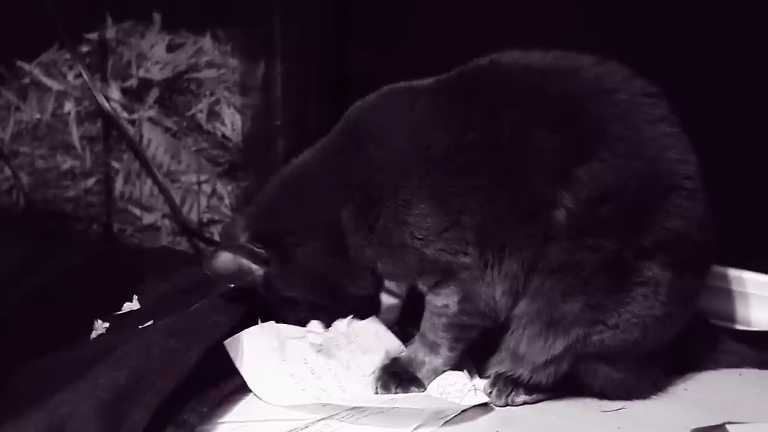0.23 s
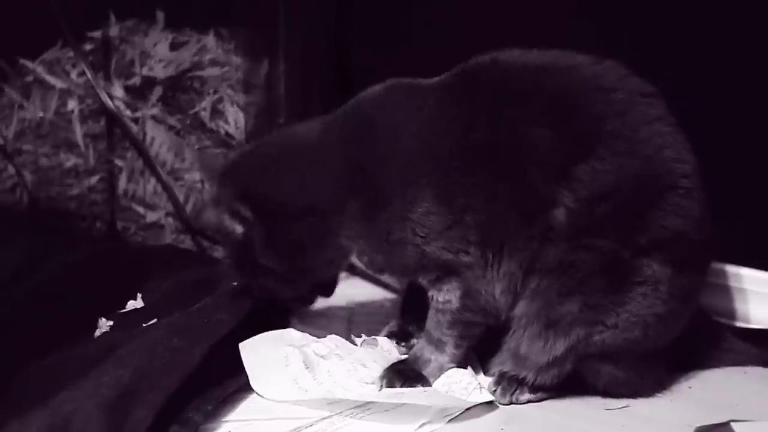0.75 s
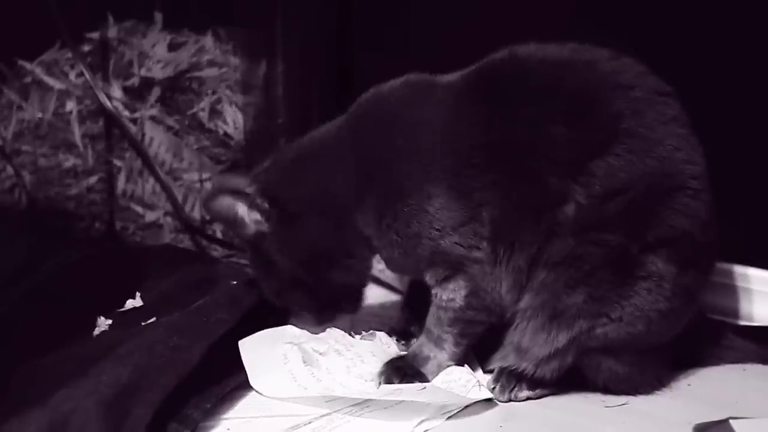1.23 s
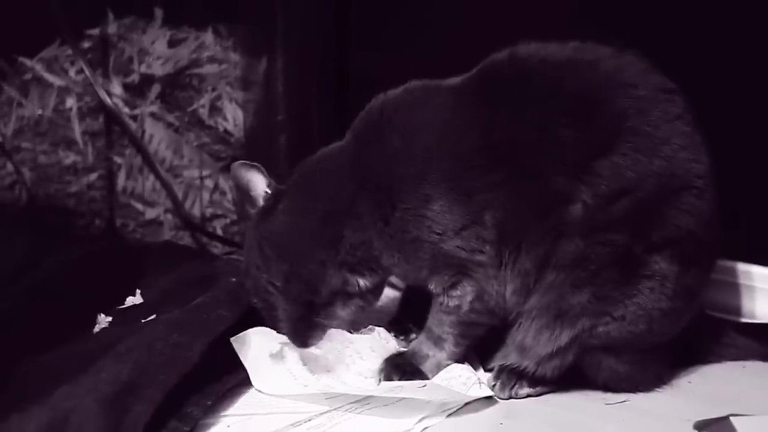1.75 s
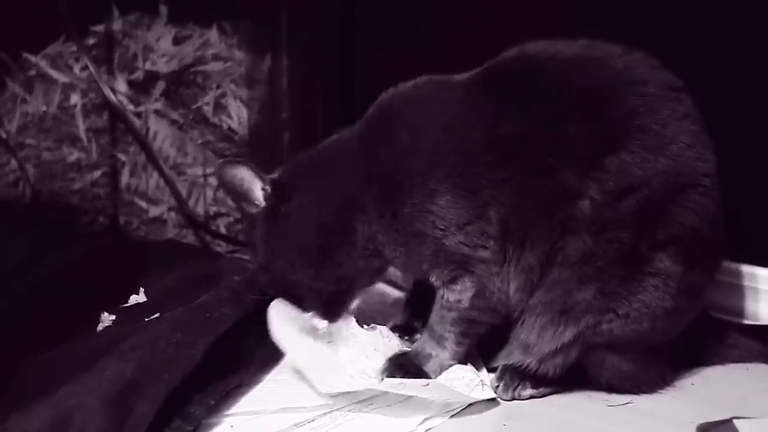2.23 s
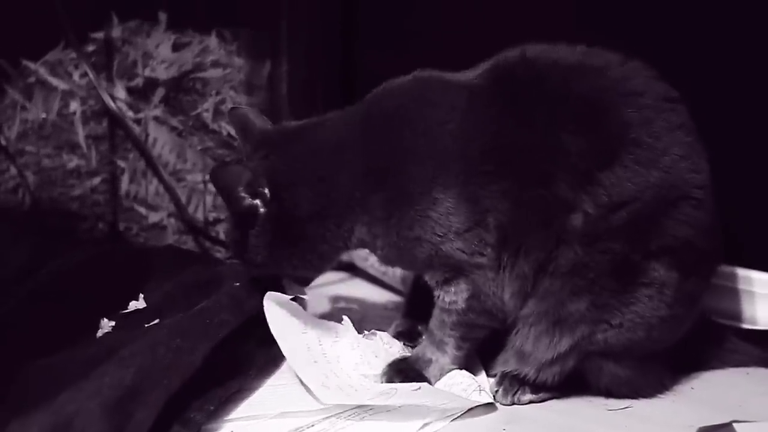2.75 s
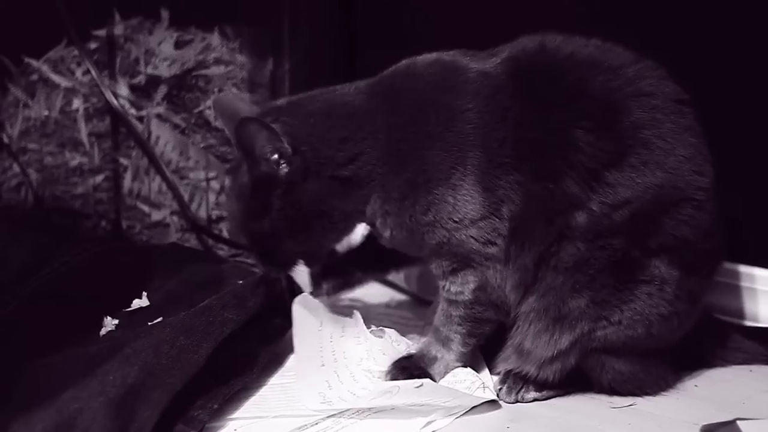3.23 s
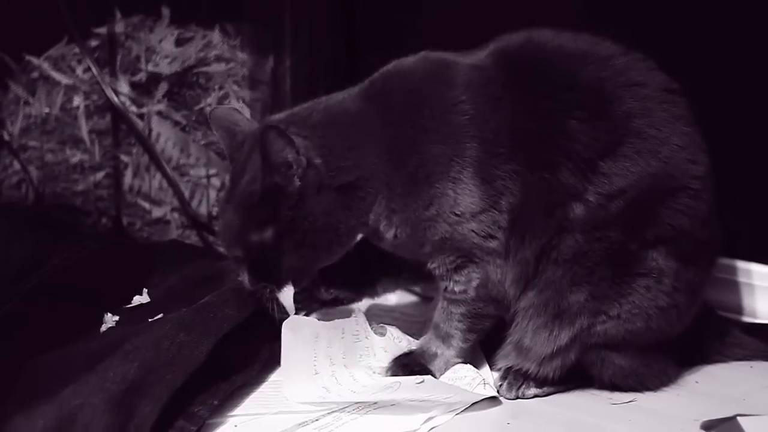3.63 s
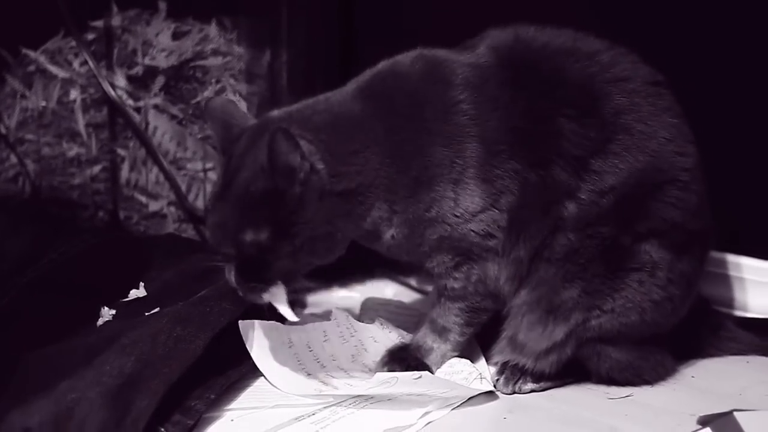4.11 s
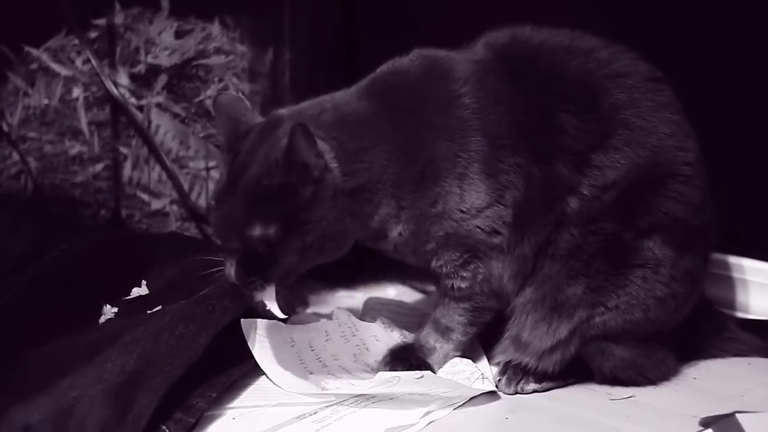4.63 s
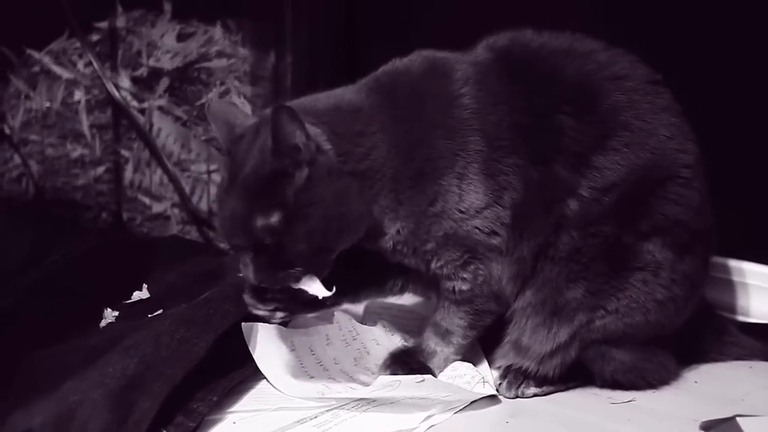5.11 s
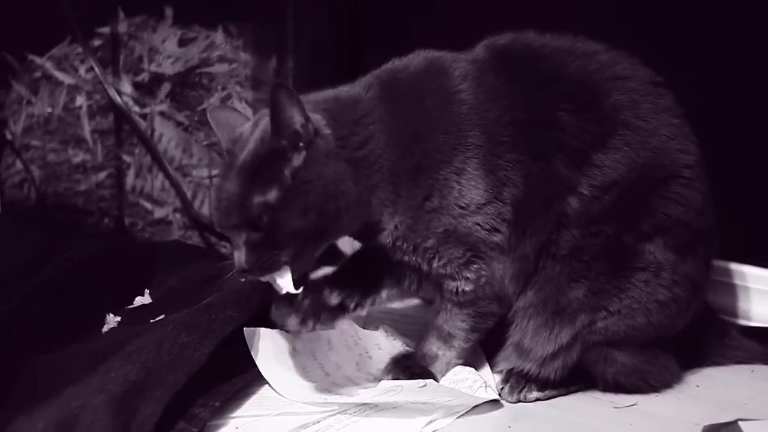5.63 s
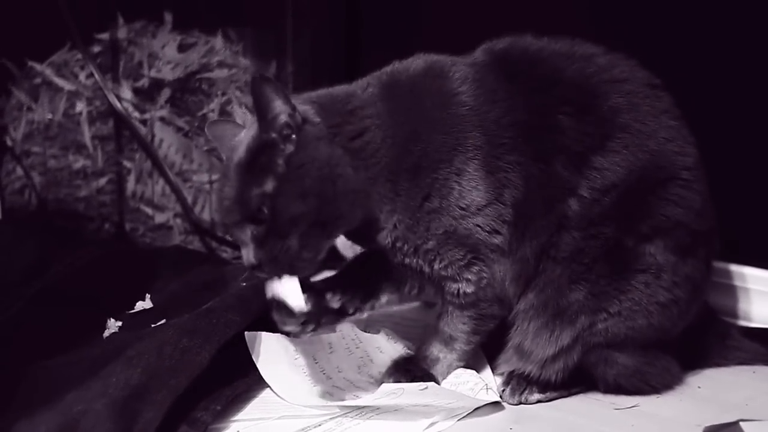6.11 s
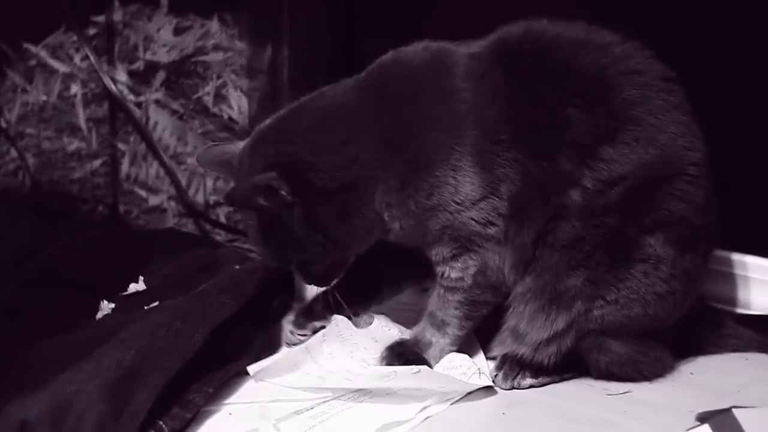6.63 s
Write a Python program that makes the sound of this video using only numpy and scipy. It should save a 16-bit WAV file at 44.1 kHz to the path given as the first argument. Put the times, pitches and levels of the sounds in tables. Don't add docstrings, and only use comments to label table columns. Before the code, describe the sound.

Close crisp paper ripping and snapping in short fits, a long spell of soft fur rustle, then a last tug and a paw thud.

```python
import sys
import numpy as np
from scipy import signal
from scipy.fft import rfft, irfft
from scipy.io import wavfile
from scipy.ndimage import uniform_filter1d

SR = 44100
rng = np.random.default_rng(int(sys.argv[2]) if len(sys.argv) > 2 else 0)


def file_out(sig):
    cols = np.atleast_2d(sig).T
    lim = np.clip(cols, -1, 1)
    pcm = np.round(lim * 32767).astype(np.int16)
    wavfile.write(sys.argv[1], SR, pcm)


def elevation(decibels):
    levels = np.asarray(decibels, float)
    return 10 ** (levels / 20)


N = 302526

# (t/s, peak/dB, pitch of the buckled patch f/Hz, treble/dB re peak, boom/dB re peak)
BUCKLES = [(0.1539, -21, 1520, -3, -9), (0.2961, -12, 2200, -36, -19), (0.383, -9, 1890, -19.5, -22),
           (0.4853, -25, 2060, -32, -8.5), (0.5422, -26.5, 1950, -14, -15), (0.601, -1, 2670, -19.5, -28.5),
           (0.7866, -43, 3160, 2.5, -17), (0.833, -45.5, 2060, 2, -22), (0.8677, -27.5, 1800, -27, -24),
           (1.7916, -31, 2260, -14, -11), (2.036, -28, 2520, -34, -39), (2.0422, -13.5, 2650, -44, -46),
           (2.142, -11, 1560, -11.5, -20.5), (2.2023, -12, 2300, -15.5, -49),
           (2.9112, -14.5, 2000, -15, -24), (3.0829, -15, 2620, -19, -19),
           (3.4716, -31.5, 2150, -10.5, -24), (3.562, -31, 3330, 1.5, -32),
           (3.6558, -16.5, 2220, -28, -13.5), (3.713, -23.5, 1950, -16, -10), (3.8296, -24, 1910, -26, -17),
           (3.877, -14, 1890, -11, -15.5), (3.894, -7.5, 2850, -33, -39), (6.588, -23.5, 1600, -41, -21.5)]
# (f/Hz, width/Hz, level/dB)
FIBRE_TONES = [(4580, 1100, 5), (7260, 1260, 3.5), (10980, 3000, 3.5), (15000, 1700, -3)]
TREBLE_TIMES_PITCH = 3.27


def ring(x, hz, width_hz):
    return signal.lfilter(*signal.iirpeak(hz, hz / width_hz, fs=SR), x)


def lift(x, modes):
    return x + sum(elevation(db) * ring(x, hz, width_hz) for hz, width_hz, db in modes)


def band(x, lo_hz, hi_hz):
    y = signal.sosfilt(signal.butter(2, [lo_hz, hi_hz], "band", fs=SR, output="sos"), x)
    return y * np.sqrt(SR / 2 / (hi_hz - lo_hz))


def walk(rate):
    hold = int(SR / rate)
    return uniform_filter1d(np.repeat(rng.standard_normal(N // hold + 1), hold), hold)[:N]


def during(spans):
    t = np.arange(N) / SR
    return uniform_filter1d(1. * sum((t >= a) & (t < b) for a, b in spans), size=441)


def patch(x, hz, db):
    rung = ring(x, hz, hz / 7)
    return x + elevation(db) * rung * np.linalg.norm(x) / np.linalg.norm(rung)


def add(out, s, burst, levels_db):
    start = int(s * SR)
    out[:, start:start + burst.shape[1]] += elevation(np.array(levels_db))[:, None] * burst


def fan():
    # (f/Hz, level/dB per Hz)
    air_colour = [(20, -13), (70, -16.5), (200, 0), (500, -1.5), (900, -2), (1500, 3.5), (2500, 3.5),
                  (4000, -8.5), (8000, -17), (16000, -20.5)]
    # (f/Hz, width/Hz, level/dB)
    duct = [(402, 5.6, 9), (478, 27, 2.5), (610.4, 15.4, 8.5), (854, 140, 5)]
    # (f/Hz, rms level/dB)
    hum_lines = [(59.4, -87), (90, -66.5), (97, -70.5), (120, -69.5), (124.9, -82), (194, -78.5),
                 (291, -80), (485, -80)]
    air_db = -52.5
    hz = np.maximum(np.fft.rfftfreq(N, 1 / SR), 1)
    colour_hz, colour_db = np.transpose(air_colour)
    colour = elevation(np.interp(np.log(hz), np.log(colour_hz), colour_db))
    air = lift(irfft(rfft(rng.standard_normal(N)) * colour, N), duct)
    air = air / air.std() * elevation(air_db + .3 * walk(1.5) + .6 * walk(14))
    t = np.arange(N) / SR
    hum = 0
    for f, db in hum_lines:
        wavering = elevation(db + 3 + .6 * walk(4))
        hum = hum + wavering * np.sin(2 * np.pi * (f * t + rng.random()))
    return air + hum


def breaks(per_s, spread_db, smear_ms):
    happens = rng.random(N) < per_s / SR
    size = happens * elevation(np.minimum(spread_db * rng.standard_exponential(N), 9))
    fade = np.exp(-np.arange(441) / (smear_ms * SR / 1000))
    reach = signal.fftconvolve(size ** 2, fade)[:N]
    trains = np.sqrt(np.abs(reach)) * rng.standard_normal((3, N))
    return trains / trains.std()


def tearing():
    # (t/s, effort as crackle level/dB)
    pulls = [
        [(0.0, -52.5), (0.2, -53), (0.322, -43), (0.466, -43.5), (0.514, -46), (0.628, -49), (0.71, -70),
         (0.896, -65), (1.0, -79)],
        [(1.7, -55.5), (2.012, -52), (2.166, -44.5), (2.3, -43.5), (2.386, -28.5), (2.5, -33), (2.55, -42),
         (2.606, -60), (2.75, -72)],
        [(2.85, -72), (2.962, -49), (3.016, -51), (3.1, -49), (3.16, -46), (3.27, -37), (3.35, -46.5)],
        [(3.35, -60.5), (3.56, -49.5), (3.748, -51), (3.812, -52.5), (3.946, -60), (4.05, -88)],
        [(6.45, -74), (6.586, -44), (6.74, -56), (6.86, -44.5)],
    ]
    middle_effort_db = -45
    # level at the middle effort, and dB gained per dB of effort
    middle_db = np.array([[-52], [-58.5], [-60.5]])
    slope = np.array([[1], [1.07], [0.86]])
    clumps_db = walk(120) * np.array([[3.], [2.2], [2.2]])
    effort_db = np.interp(np.arange(N) / SR, *np.vstack(pulls).T) - middle_effort_db
    levels_db = middle_db + slope * effort_db
    bouts = during([(p[0][0], p[-1][0]) for p in pulls])
    return breaks(1800, 1.2, 0.85) * bouts * elevation(levels_db + clumps_db)


def every_slip():
    # (t/s, peak/dB, treble/dB re peak, boom/dB re peak)
    lone_slips = [(0.0044, -33.5, -24, -6.5), (0.0282, -29.5, -24, -17), (0.277, -34, -18, -23),
                  (0.3598, -23, -31, -16), (0.3944, -11, -19, -22.5), (0.4333, -12, -19.5, -50),
                  (0.5157, -41, -14, -22), (0.5755, -17.5, -26, -18.5), (0.5861, -15.5, -14, -23),
                  (0.8854, -27.5, -17.5, -43), (1.4226, -32.5, -27, -14), (1.7774, -35, -12, -11),
                  (1.9031, -35.5, -14, -11.5), (1.939, -37, -15, -4), (1.9769, -29, -27, -30),
                  (2.304, -22, -11, -16.5), (3.1797, -22, -24, -29), (3.2110, -14, -22.5, -23),
                  (3.5245, -34, -17, -13), (3.5778, -27, -17, -20), (3.7311, -25, -17, -19),
                  (3.7578, -23, -18.5, -25), (3.8498, -19, -13.5, -17.5), (5.207, -36, -18, -30),
                  (6.5443, -24.5, -17.5, -20), (6.6032, -20.5, -29, -16), (6.6254, -25.5, -12, -11.5),
                  (6.6494, -29, -24, -11.5), (6.755, -26, -36, -15.5), (6.782, -30.5, -23, -32)]
    # (start t/s, end t/s, first level/dB, last level/dB, treble/dB re peak)
    runs = [
        (0.403, 0.422, -16.5, -5, -17.5),
        (0.614, 0.682, -31, -45, -10),
        (2.3314, 2.447, -15.5, -18, -15.5),
        (2.4592, 2.546, -12, -15.5, -14.5),
        (2.9228, 2.983, -13.5, -19, -17.5),
        (3.0905, 3.16, -14.5, -18, -18),
        (3.233, 3.317, -15, -17.5, -16),
        (3.8618, 3.89, -14, -11.5, -12.5),
        (3.907, 3.94, -17, -32, -24),
        (6.553, 6.577, -22.5, -29, -31),
    ]
    slip_hz, slip_ms, run_slip_ms = 2000, 12.7, 7.95
    gap_s, gap_spread, scatter_db, run_boom_db = .011, .35, 2, -24
    rows = [(*row, slip_hz * 1.16 ** rng.standard_normal(), slip_ms) for row in lone_slips]
    for s, db, hz, treble_db, boom_db in BUCKLES:
        rows.append((s + .0025, min(db - 8, -20), treble_db / 2 - 1, boom_db, hz, 10.6))
    for start, end, first_db, last_db, treble_db in runs:
        gap, size, bright, deep, pitch = np.clip(rng.standard_normal((5, 20)), -2, 2)
        s = start + np.cumsum(gap_s * np.exp(gap_spread * gap))
        s = s - s[0] + start
        db = first_db + (last_db - first_db) * (s - start) / (end - start) + scatter_db * size
        db = np.where(s < end, db, -200)
        chain = [s, db, treble_db + scatter_db * bright, run_boom_db + 2 * scatter_db * deep,
                 slip_hz * 1.16 ** pitch, np.full(20, run_slip_ms)]
        rows += list(np.transpose(chain))
    return rows


def slips():
    length_spread, flap_db, flap_scatter_db = 0.22, -12.5, 2.5
    taut_from_s, taut_to_s, taut_db = 3.2, 3.35, -22
    out, ms = np.zeros((3, N + 3000)), np.arange(3000) * 1000 / SR
    for s, db, treble_db, boom_db, hz, mean_ms in every_slip():
        fine = rng.standard_normal((4, 3000))
        uneven = elevation(4.5 * np.repeat(np.clip(fine[3, :150], -2, 1.5), 20))
        length_ms = mean_ms * np.exp(length_spread * fine[3, -3])
        burst = fine[:3] * uneven * (1 - np.exp(-ms / 0.46)) * np.exp(-ms / length_ms)
        loose_db = flap_db + flap_scatter_db * fine[3, -4] + 8
        loose_db = loose_db + taut_db * (taut_from_s < s < taut_to_s)
        burst[0] = patch(burst[0], 3100 * 1.07 ** fine[3, -1], loose_db)
        burst[1] = patch(burst[1], TREBLE_TIMES_PITCH * hz, -9)
        burst[0] = patch(burst[0], hz * 1.05 ** fine[3, -2], -5)
        add(out, s, burst, [db - 29.5, db + treble_db - 11, db + boom_db - 8.5])
    return out[:, :N]


def snaps():
    out, ms = np.zeros((3, N + 3000)), np.arange(3000) * 1000 / SR
    for s, db, hz, treble_db, boom_db in BUCKLES:
        fine = rng.standard_normal((3, 3000))
        crack = fine * np.exp(-ms / np.array([[.4], [.9], [.6]]))
        scatter = elevation(-29) * fine * np.exp(-ms / 16)
        burst = crack / np.linalg.norm(crack, axis=1)[:, None] + scatter
        burst[0] = patch(burst[0], hz, -3)
        burst[1] = patch(burst[1], TREBLE_TIMES_PITCH * hz, -5)
        add(out, s, burst, [db - 6, db + treble_db + 4.5, db + boom_db + 13.0])
    return out[:, :N]


def paper(body, treble, boom):
    # (f/Hz, width/Hz, level/dB)
    sheet_modes = [(321, 23.7, 1.5), (444, 51.7, 8), (655, 370, -11.5), (189, 160, -3), (870, 970, -6)]
    patchy_db = 3.5
    sheet = sum(elevation(db) * ring(boom, hz, width_hz) for hz, width_hz, db in sheet_modes)
    hiss = band(treble, 4630, 17600)
    patches = sum(elevation(db + patchy_db * walk(30)) * ring(hiss, hz, width_hz) for hz, width_hz, db in FIBRE_TONES)
    air_gap = [(2080, 380, -3), (1500, 500, -6)]
    crack = lift(band(body, 700, 4200), air_gap)
    return crack + elevation(-8.0) * hiss + patches + elevation(5) * band(sheet, 148, 1660)


def brushing():
    # (t/s of the peak, level/dB, fade/ms per 10 dB)
    strokes = [(1.166, -59, 21), (1.418, -56.5, 45), (1.6, -59.5, 90), (4.12, -63, 40), (4.27, -57, 80),
               (4.44, -66, 60), (4.57, -61.5, 80), (4.72, -56.5, 28), (5.0, -63, 70), (5.2, -57.5, 114),
               (5.32, -60, 60), (5.46, -61, 25), (5.79, -55.5, 25), (5.97, -55.5, 37), (6.08, -58, 25),
               (6.27, -56, 34), (6.49, -69, 40)]
    # (start t/s, end t/s)
    spells = [
        (1.0, 1.7),
        (4.05, 6.5),
    ]
    rise_share, rest_db = 0.75, -74
    t, db = np.arange(N) / SR, np.full(N, 1. * rest_db)
    for s, peak_db, fade_ms in strokes:
        late_ms = (t - s) * 1000
        away_ms = np.maximum(late_ms, -late_ms / rise_share)
        db = np.maximum(db, peak_db - 10 * away_ms / fade_ms)
    crackle = breaks(2500, 0.98, 0.22)[0] * during(spells) * elevation(db - 8.0)
    return lift(band(crackle, 4200, 21600), FIBRE_TONES)


def standing_sheet(boom):
    upright = during([(2.88, 3.95)])
    boom = boom * elevation(1.5 * upright)
    return boom, elevation(17) * ring(boom * upright, 170.5, 61)


def ticks():
    # (t/s, peak/dB)
    whisker_ticks = [(3.0907, -28), (3.1133, -22), (3.2099, -34), (3.2293, -30), (3.247, -23), (3.2782, -26),
                     (3.5236, -42), (3.562, -37), (3.6094, -36), (3.6439, -36), (3.6793, -42), (3.7112, -31),
                     (3.7296, -28), (3.7596, -32), (3.802, -45), (3.8379, -37), (3.849, -33), (3.86, -20)]
    out = np.zeros(N)
    for s, db in whisker_ticks:
        start = int(s * SR)
        out[start:start + 132] = elevation(db + 6.0) * rng.standard_normal(132) * np.exp(-np.arange(132) / 40)
    return band(band(out, 13800, 22000), 12400, 21000) * elevation(-4)


def thuds():
    # (t/s, peak/dB)
    landings = [
        (6.8222, -33),
        (6.8407, -41),
    ]
    out = np.zeros(N)
    for s, db in landings:
        start = int(s * SR)
        out[start:start + 36] = -elevation(db + 4.5) * np.hanning(36)
    return elevation(10.5) * ring(out, 890, 210) + elevation(1.0) * ring(out, 250, 300) + elevation(1.0) * ring(out, 160, 160)


def room(x):
    t60_s, echo_db = .24, -6
    t = np.arange(SR // 2) / SR
    echo = rng.standard_normal((2, len(t))) * (t > .004)
    dull = band(echo[0], 100, 4000) * elevation(-60 * t / t60_s)
    bright = band(echo[1], 4000, 18000) * elevation(-70 * t / t60_s)
    tail = dull + elevation(10.0) * bright
    return x + elevation(echo_db) * signal.fftconvolve(x, tail / np.linalg.norm(tail))[:N]


def scene():
    body, treble, boom = tearing() + snaps() + slips()
    boom, flap = standing_sheet(boom)
    in_room = paper(body, treble, boom) + flap + brushing() + ticks()
    return (room(in_room) + thuds() + fan())[None]


def band_limit(x):
    return signal.sosfilt(signal.butter(12, 16970, fs=SR, output="sos"), x)


def record(dry):
    # (f/Hz, width/Hz, level/dB)
    mic_hole = [(1950, 402, 6), (2510, 130, -23), (10700, 790, -21), (16000, 710, -22)]
    top_cut = signal.ellip(8, .2, 30, 15800, fs=SR, output="sos")
    heard = signal.sosfilt(top_cut, lift(dry, mic_hole))
    heard = np.tanh(1.2 * heard) / 1.2
    return band_limit(heard)


dry = scene()
out = record(dry)
file_out(out)
```